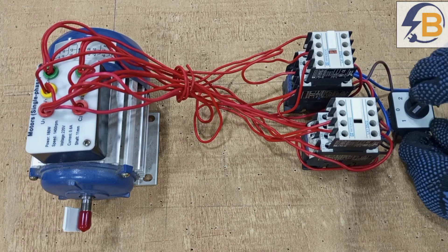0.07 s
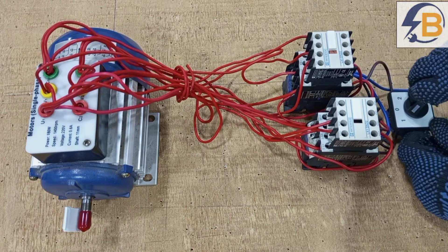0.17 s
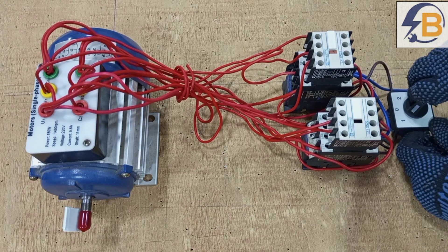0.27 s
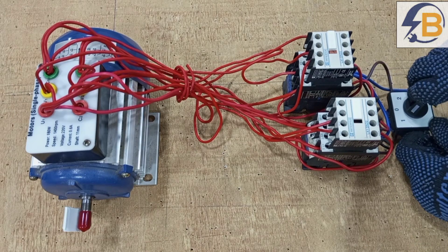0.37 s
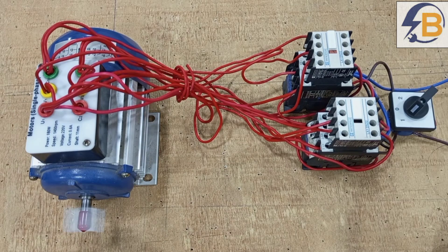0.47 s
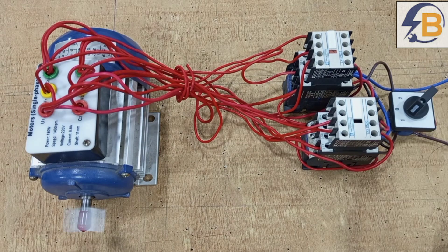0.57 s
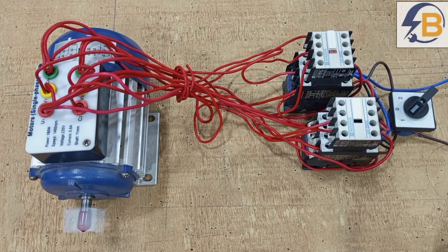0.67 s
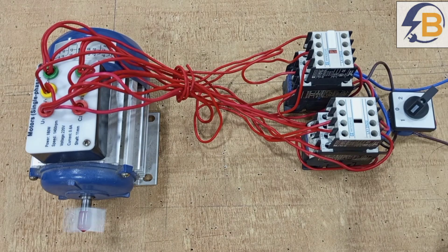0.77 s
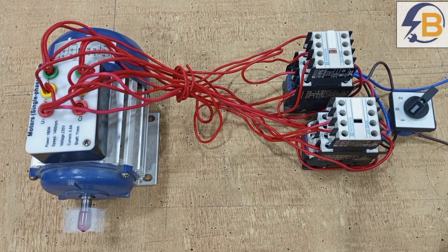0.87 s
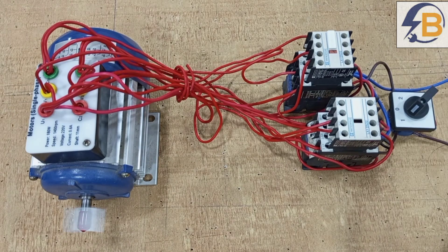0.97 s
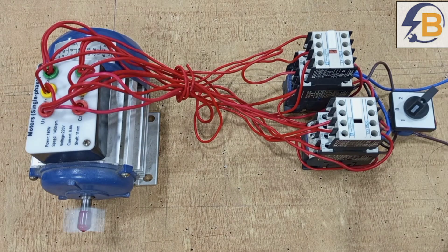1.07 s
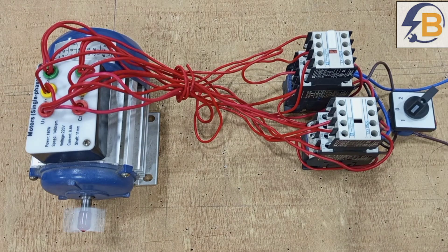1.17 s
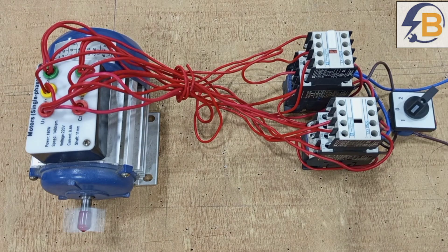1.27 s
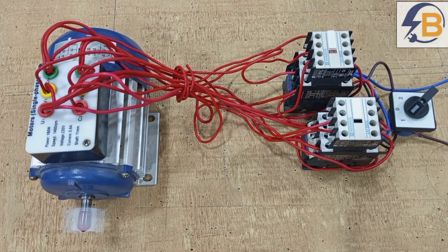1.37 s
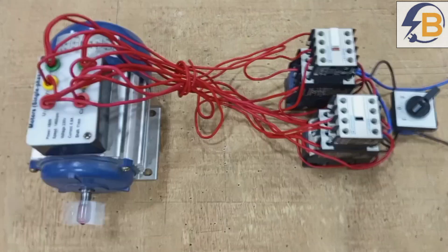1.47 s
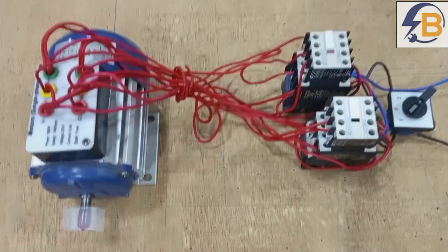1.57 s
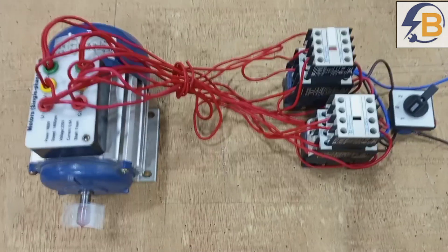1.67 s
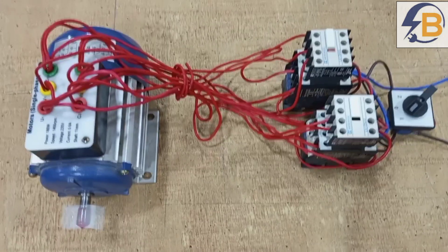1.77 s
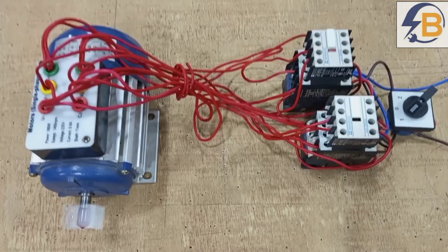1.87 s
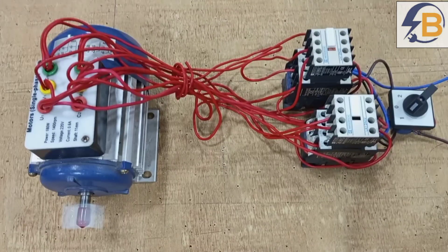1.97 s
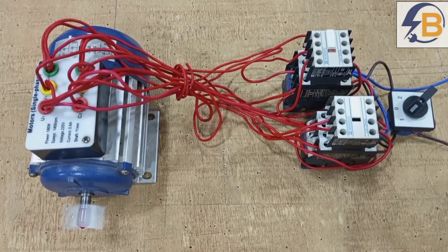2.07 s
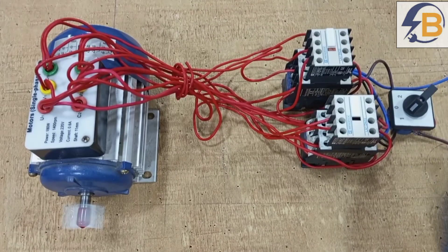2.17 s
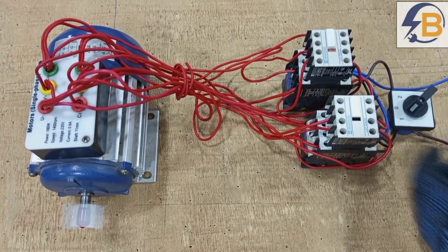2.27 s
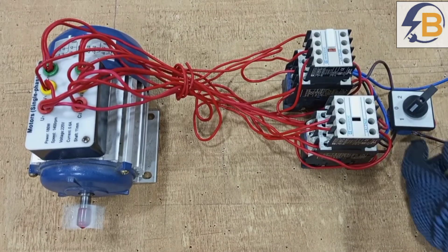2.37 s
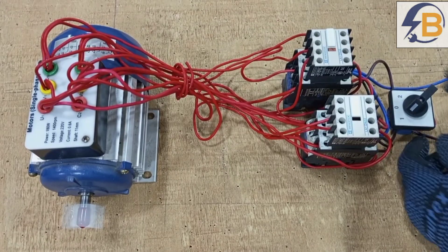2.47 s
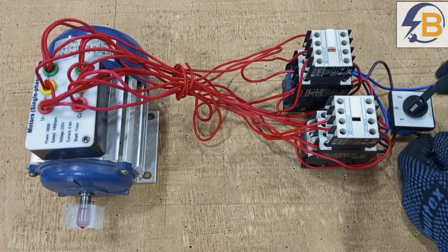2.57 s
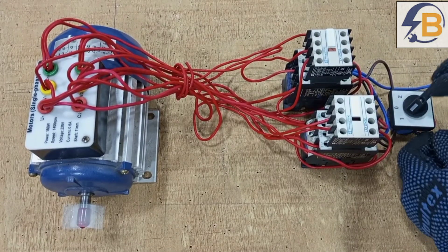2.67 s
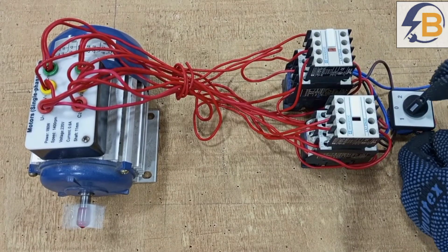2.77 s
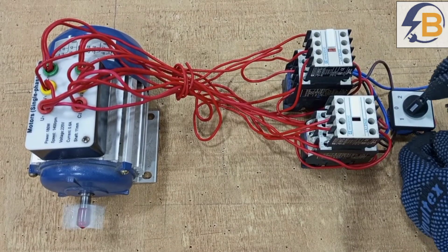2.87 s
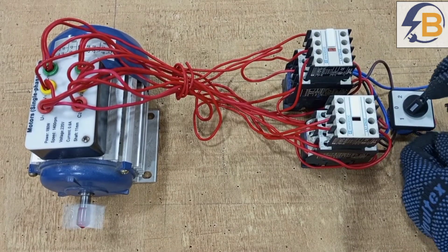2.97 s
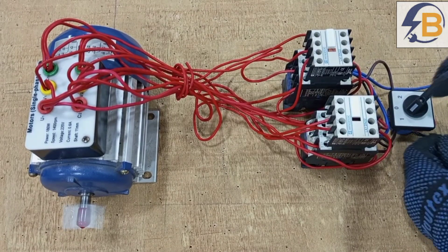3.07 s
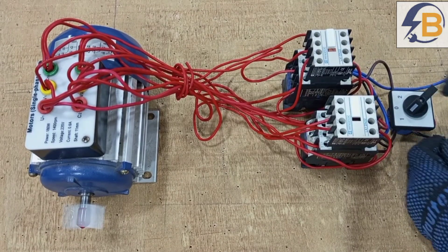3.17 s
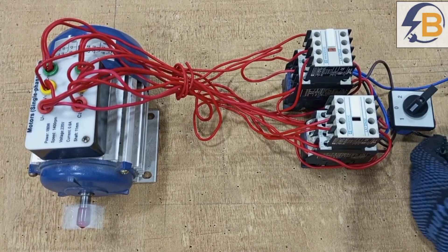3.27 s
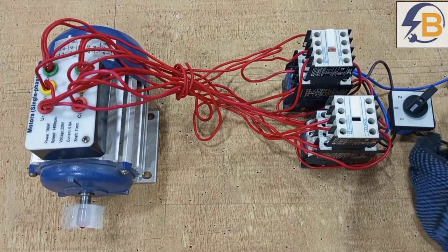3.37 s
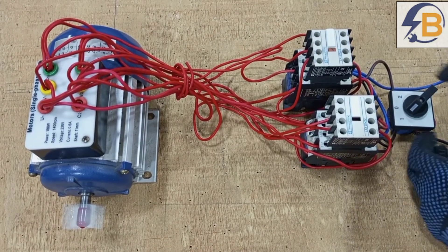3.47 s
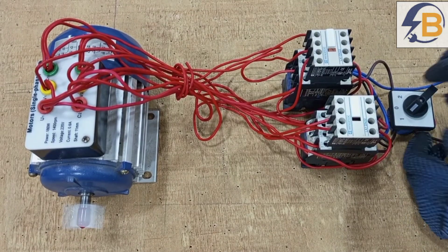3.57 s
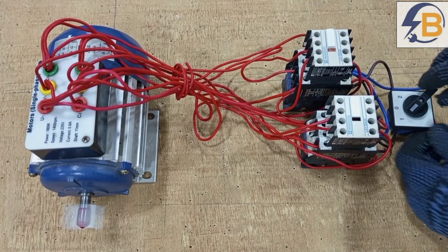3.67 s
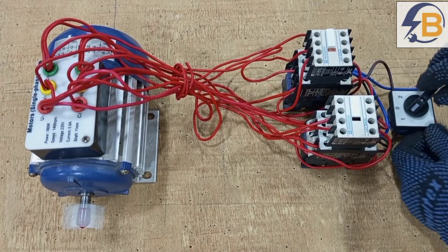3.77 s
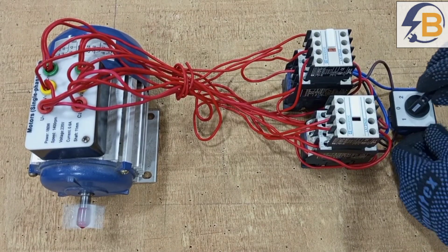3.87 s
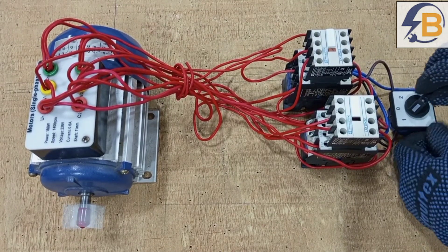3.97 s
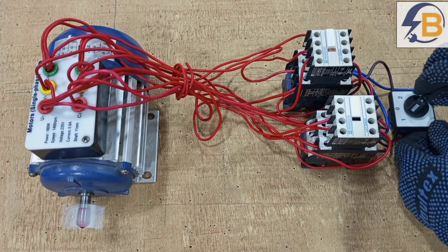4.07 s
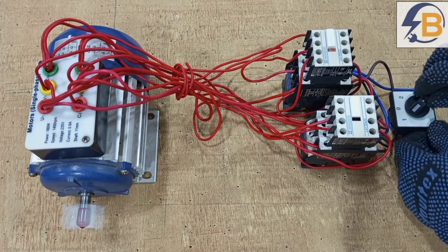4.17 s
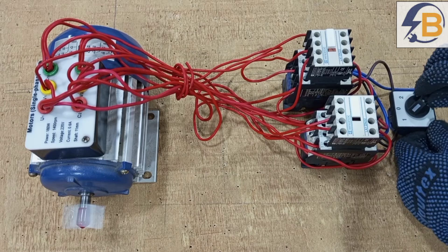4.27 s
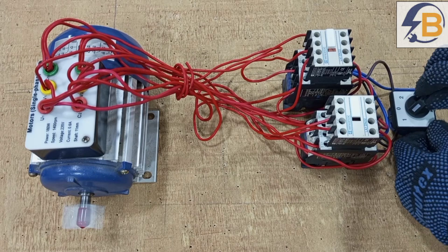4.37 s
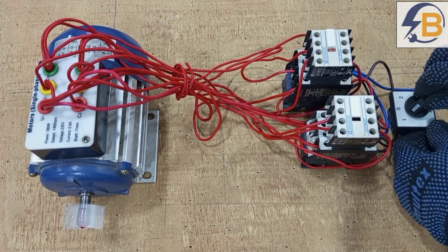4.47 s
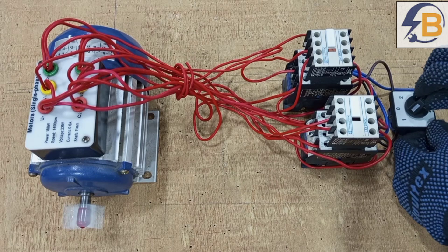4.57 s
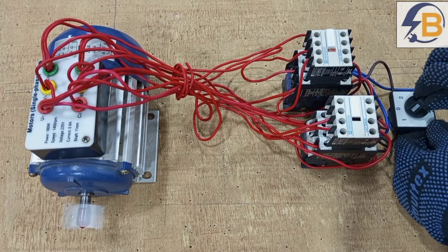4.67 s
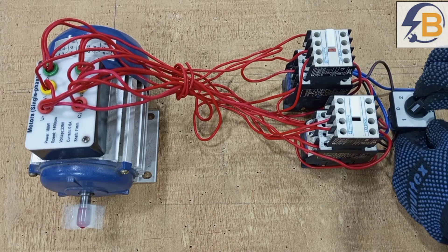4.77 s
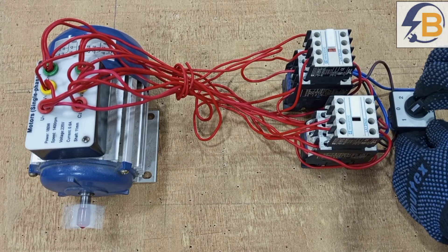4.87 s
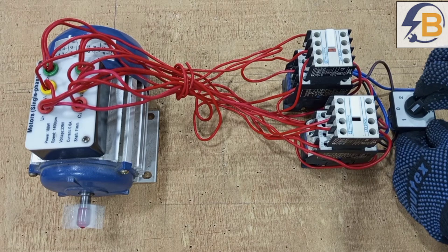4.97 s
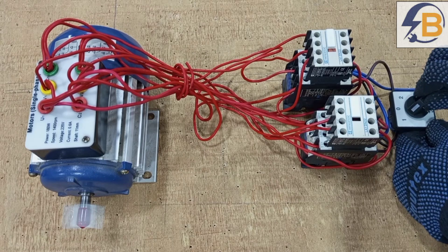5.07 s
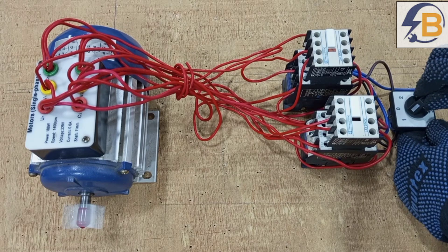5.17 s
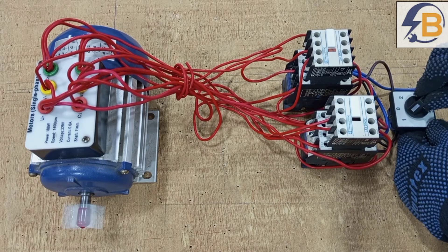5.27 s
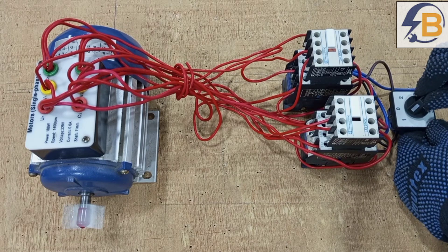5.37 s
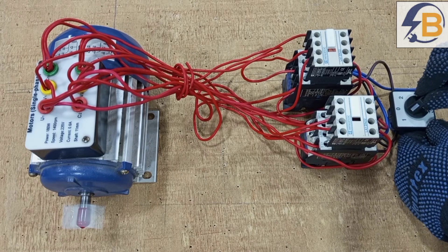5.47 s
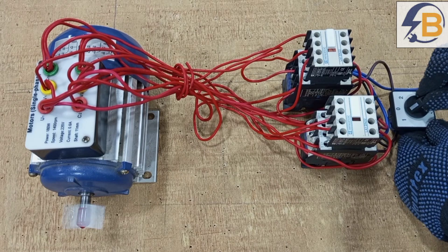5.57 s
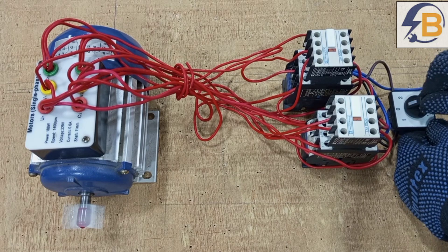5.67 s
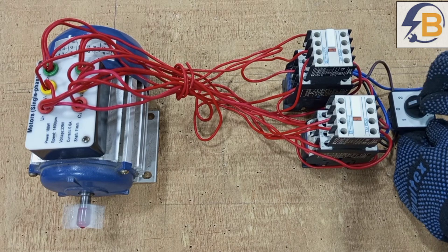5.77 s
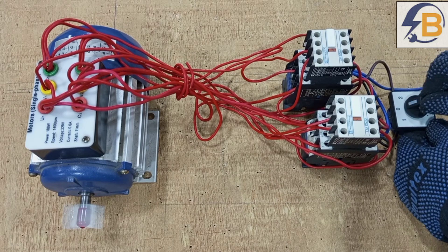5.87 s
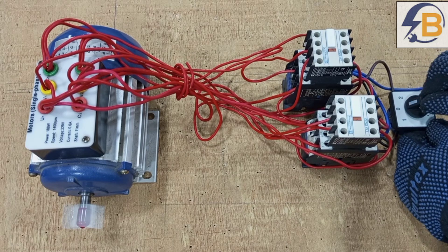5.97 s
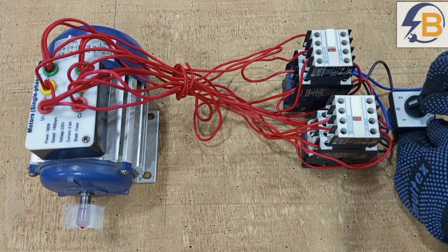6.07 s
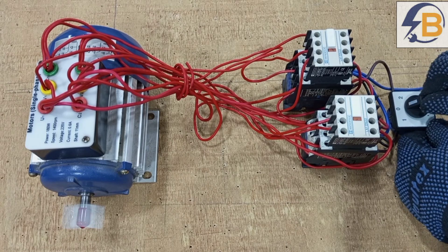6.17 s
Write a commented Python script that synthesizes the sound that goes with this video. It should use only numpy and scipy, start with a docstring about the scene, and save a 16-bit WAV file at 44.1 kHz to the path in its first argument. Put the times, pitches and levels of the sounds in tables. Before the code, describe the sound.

A hard plastic contactor clack, then a small electric motor surges into a low hum, runs quietly, and a second sharp clack cuts it off.

```python
"""A small mains motor on a wooden bench hums up, runs and is cut off: sines at twice mains and its octave.
A gloved hand turns a rotary switch and a contactor slams in; a second clack ends the run: bursts of noise
rung by a plastic housing. Each clack leaves a wash of noise dying band by band, the first cut off short.
Resonant noise whirrs in the motor's casing, rattles the bench and sings; gliding tones groan at run-up.
Stray ticks, faint narrow tones and brushes of soft noise come and go over a steady room floor."""
import sys
import numpy as np
from scipy import signal
from scipy.fft import rfft, irfft
from scipy.io import wavfile

SR = 44100
rng = np.random.default_rng(int(sys.argv[2]) if len(sys.argv) > 2 else 0)


def store_wav(level_fs):
    """Save 16-bit WAV to argv[1]."""
    pcm = np.round(np.clip(np.atleast_2d(level_fs), -1, 1) * 32767)
    wavfile.write(sys.argv[1], SR, pcm.T.astype(np.int16))


N = 274257

# magnetic hum surging at the start and settling:
# (time_s, level_db of the pull at twice mains, octave_level_db)
HUM_COURSE = [(0.41, -73, -88), (0.47, -56, -58), (0.54, -51.5, -51.5), (0.61, -50.5, -50.5),
              (0.88, -58, -52.5), (1.04, -60, -63), (1.3, -65.5, -65), (2.02, -70.5, -65.5),
              (2.16, -63.5, -67.5), (2.37, -69, -65.5), (3.24, -67, -67), (3.82, -70.5, -66),
              (4.15, -67, -67.5), (4.31, -71, -68.5), (5.63, -70, -71.5), (5.66, -70, -76)]
MOTOR_ON_S, POWER_OFF_S = HUM_COURSE[0][0], 5.665
PULL_HZ, SHAFT_HZ = 99.9, 24.9


def from_db(db):
    """Decibels to gain."""
    return 10 ** (np.asarray(db) / 20)


def rms_one(x):
    """Scale to rms 1."""
    return x / np.sqrt(np.mean(x ** 2) + 1e-20)


def seconds():
    """The time of every sample, in seconds."""
    return np.arange(N) / SR


def in_time(rows):
    """Columns of a curve table at every sample; silence before it, held after it."""
    time_s, *columns = np.transpose(rows)
    return [np.interp(seconds(), time_s, column, left=-200) for column in columns]


def at_hz(points, hz):
    """Read a (Hz, value) table on a log-frequency axis."""
    table_hz, values = np.array(points).T
    return np.interp(np.log(hz), np.log(table_hz), values)


def drift(rate):
    """Slow chance of spread 1, changing about rate times a second; drawn at every 40th sample."""
    r = np.exp(-80 * np.pi * rate / SR)
    chance = rng.standard_normal(N // 40 + 2002)
    slow = signal.lfilter([1], [1, -2 * r, r * r], chance)[2000:]   # skip the filter's start
    return np.interp(np.arange(N) / 40, np.arange(len(slow)), rms_one(slow))


def resonate(x, hz, width_hz):
    """One resonance with gain 1 on top."""
    r = np.exp(-np.pi * width_hz / SR)
    zeros = np.array([1, 0, -1]) * (1 - r * r) / 2
    poles = [1, -2 * r * np.cos(2 * np.pi * hz / SR), r * r]
    return signal.lfilter(zeros, poles, x)


def twice(x, hz, width_hz):
    """A steep resonance, rms 1."""
    return rms_one(resonate(resonate(x, hz, width_hz), hz, width_hz))


def alternating_modes(x, modes):
    """Parallel resonances of one body, every other one in opposite sign."""
    return sum((-1) ** k * from_db(db) * resonate(x, hz, width_hz)
               for k, (hz, width_hz, db) in enumerate(modes))


def band_pass(x, edges_hz):
    """Keep the band between two edges."""
    return signal.sosfilt(signal.butter(2, edges_hz, "band", fs=SR, output="sos"), x)


def steady(spectrum):
    """Stationary noise with the given spectrum; rms 1."""
    hz = np.maximum(np.arange(N // 2 + 1) * SR / N, 1)
    return rms_one(irfft(rfft(rng.standard_normal(N)) * from_db(at_hz(spectrum, hz)), N))


def coloured(spectrum, size, fading):
    """Fifth-octave bands of noise, each at its own level and dying at its own rate; rms 1 at the start."""
    out, power, t = 0, 0, np.arange(size) / SR
    edges = 60 * 2 ** np.arange(0, 8.3, 1 / 5)
    white = rng.standard_normal((2, size))   # neighbouring bands take different noise
    for k, (low, high) in enumerate(zip(edges, edges[1:])):
        band = band_pass(white[k % 2], [low, high])
        hz = np.sqrt(low * high)
        level_db = at_hz(spectrum, hz)
        out = out + band * from_db(level_db - at_hz(fading, hz) * t)
        power += np.mean(band ** 2) * from_db(2 * level_db)
    return out / np.sqrt(power)


def swells(rows):
    """Gain that opens for each (start_s, length_s, level_db) row, with soft edges."""
    t, edge_s = seconds(), 0.038
    gain = 0
    for start_s, length_s, db in rows:
        nearest_end_s = np.minimum(t - start_s, start_s + length_s - t)
        gain = gain + from_db(db) * np.clip(nearest_end_s / edge_s + .5, 0, 1)
    return gain


def surge():
    """How far the hum's octave stands above the settled motor's -66 dB, in dB; never below 0."""
    octave_db = in_time(HUM_COURSE)[1]
    return np.maximum(octave_db + 66, 0)


def powered():
    """Gate that is open from the motor's start until the power goes."""
    t = seconds()
    return (t > MOTOR_ON_S) & (t < POWER_OFF_S)


def room_floor():
    """Steady noise of the quiet room, strongest in the lows."""
    # spectrum of the room: (frequency_hz, relative density_db)
    room_colour = [(30, -19.5), (100, -5.5), (400, -3), (1000, -7), (2000, -10.5), (3500, -18),
                   (7300, -18.5), (8500, -35.5), (15500, -42.5)]
    return from_db(-73) * steady(room_colour)


def contacts():
    """Each row is a short noise burst in one band, rung by the housing; close rows make one clack or tick."""
    # bands of the clacks, stray ticks and snaps in the rustling:
    # (start_s, peak_level_db, centre_hz, width_octaves, rise_ms, t60_ms of the snap)
    bursts = [(0.0895, -20, 4450, 1.85, 1.07, 10.4), (.09, -29.5, 620, 1.0, 1.6, 39),
              (.09, -33, 1550, 0.5, 1.6, 30), (0.0976, -31, 9000, 7.3, .6, 12),
              (0.1035, -27.5, 805, 0.73, 0.69, 7), (0.1085, -30, 8000, 3.3, 2, 20.5),
              (0.1136, -26, 2500, 14, 0.52, 12), (.1198, -11, 3600, 2.8, 0.81, 3.2),
              (.1236, -18.5, 860, 1.54, .3, 3.6), (.125, -31.5, 376, 1.3, 1.6, 45),
              (0.1364, -32, 5490, 2.36, 1.1, 29.8), (.1455, -37, 6010, 1.498, 1.1, 27),
              (0.177, -32, 220, 1.8, 6.8, 43), (1.5679, -44.5, 9100, 0.27, .6, 9.1),
              (1.5688, -51.5, 4700, 0.58, .7, 13.5), (1.583, -42.5, 4900, 0.9, .6, 8),
              (1.5834, -47, 9200, 0.47, 0.44, 7.7), (1.583, -47.5, 1330, 0.37, 0.53, 20),
              (1.5867, -42, 1200, 0.8, 0.46, 14.5), (1.5863, -37, 5070, 0.9, 0.44, 6.7),
              (1.887, -49.5, 9600, 0.34, 1.5, 30), (2.029, -48, 9700, 0.56, 0.293, 180),
              (5.6801, -35, 7000, 1.9, 0.8, 16), (5.689, -33.5, 4000, 2.1, 5.3, 40),
              (5.6961, -18, 10100, 1.45, 3.83, 14), (5.694, -43, 340, 0.88, 2.5, 50),
              (5.7025, -28, 5000, 2.7, 0.65, 18), (5.7054, -8, 2700, 1.42, 1.8, 5.3),
              (5.707, -21, 14000, 1.5, 0.94, 22), (5.7201, -23.5, 3480, 9.3, 0.37, 29),
              (5.7315, -28, 3500, 1.7, 1.35, 30)]
    # resonances of the plastic housing: (frequency_hz, width_hz, gain_db)
    housing = [(864, 100, -16.5), (1700, 280, -0.5), (2428, 360, 3), (3140, 490, 6), (4010, 1200, -1),
               (5140, 361, 10.5), (5600, 920, 1), (6440, 140, 10.5), (7000, 335, -5.5), (9400, 3400, 4.5),
               (10590, 440, -3), (13880, 1200, -9.5)]
    out, t = np.zeros(N), np.arange(4000) / SR
    for start_s, peak_db, hz, octaves, rise_ms, t60_ms in bursts:
        burst = rng.standard_normal(len(t)) * np.minimum(1000 * t / rise_ms, 1) ** 2
        since_ms = np.maximum(1000 * t - rise_ms, 0)
        snap = from_db(-60 * since_ms / t60_ms)
        loose_parts = from_db(-20.0 - 60 * since_ms / 55)   # they settle after the snap
        burst *= snap + loose_parts
        burst[round(rise_ms * SR / 1000)] += 3.5   # the hardest touch comes at the top of the rise
        edges_hz = np.clip(hz * 2 ** (np.array([-.5, .5]) * octaves), 50, .45 * SR)
        burst = band_pass(burst, edges_hz)
        hit = alternating_modes(burst, housing) + 0.46 * burst
        at = round(start_s * SR)
        out[at:at + len(t)] += from_db(peak_db) * hit / np.abs(hit).max()
    return out


def wash(curve, colour, fading, ring, end_s):
    """Dense reflections after a clack: noise of the clack's colour, thinning band by band."""
    out = np.zeros(N)
    first, last = round(curve[0][0] * SR), min(round(end_s * SR), N)
    level_db = np.interp(np.arange(first, last) / SR, *np.transpose(curve))
    ramp = np.minimum(np.arange(last - first) / (0.0086 * SR), 1)   # 8.6 ms onset
    noise = coloured(colour, last - first, fading)
    # each tone's level is set free of the colour's level at its pitch
    ringing = sum(from_db(db - at_hz(colour, hz) - 2.0) * resonate(noise, hz, width_hz)
                  for hz, width_hz, db in ring)
    out[first:last] = ramp * from_db(level_db) * (1.15 * noise + ringing)
    return out


def switch_on_wash():
    """Reverberant wash of the first clack, cut off short."""
    # course before the ringing is added: (time_s, relative level_db)
    curve = [(0.134, -41), (0.182, -36.5), (0.402, -49), (0.41, -49.5)]
    # spectrum at the start: (frequency_hz, relative density_db)
    colour = [(100, -29.5), (170, 1), (400, 0.5), (900, -6), (1200, -11.5), (2000, -10), (2900, -12),
              (3600, -20), (5600, -9.5), (7500, -18.5), (9500, -15.5), (12500, -27.5), (15000, -26.5),
              (16500, -27)]
    # how much faster than the whole each band dies: (frequency_hz, extra_decay_db_per_s)
    fading = [(150, 56.5), (400, 44), (1000, -5.5), (3000, -8), (7000, 1.5), (14000, 28)]
    # tones that linger in the wash: (frequency_hz, width_hz, relative level_db)
    ring = [(412.2, 150, -0.5), (790, 120, -2.5), (2017, 28, -5.5), (3130, 120, -6), (4012, 270, -7.5),
            (5100, 44, -4.5), (5640, 420, -4.5), (7300, 54, -11), (8000, 80, -12.5), (9160, 44, -9.5),
            (9470, 24, -9), (9700, 170, -9)]
    return wash(curve, colour, fading, ring, end_s=.4125)


def magnetic_hum():
    """Magnetic pull at twice mains and its octave; the field collapses at power-off, a trace lingers."""
    t = seconds()
    pull_db, octave_db = in_time(HUM_COURSE)
    phase = 2 * np.pi * PULL_HZ * t
    hum = from_db(pull_db + 1.72 * drift(41.8)) * np.sin(phase + 0.094 * drift(8.7))
    hum += from_db(octave_db + 1.1 * drift(16)) * np.sin(2 * phase - 1.9)
    drop_db, dies_db_per_s = -4.5, 40
    dying_db = (t > POWER_OFF_S) * (drop_db - dies_db_per_s * (t - POWER_OFF_S))
    return np.sqrt(2) * from_db(dying_db) * hum


def bench_rattle():
    """Noise pulsing once per shaft turn shakes the wooden bench's resonances; jolts open it further."""
    # resonances of the bench: (frequency_hz, width_hz, gain_db)
    bench = [(252, 30, 6.5), (260, 19, 3.5), (303, 36.7, 14), (405.5, 21, 9.5)]
    # jolts that shake the bench: (start_s, length_s, level_db)
    jolts = [(3.74, 0.03, -66.5), (5.685, 0.092, -56.5), (5.8, 0.1, -62)]
    t = seconds()
    shake = rng.standard_normal(N) * (1 + 0.8 * np.cos(2 * np.pi * SHAFT_HZ * t))
    settled_db, db_per_surge_db, flicker_db = -82, .7, 3
    level_db = settled_db + db_per_surge_db * surge() + flicker_db * drift(6)
    gain = (t > MOTOR_ON_S) * from_db(level_db) + swells(jolts)
    return gain * rms_one(alternating_modes(shake, bench))


def casing_noise():
    """Bearing and fan noise: flickering resonances of the motor's casing over a broad bed."""
    # resonances of the casing: (frequency_hz, width_hz, relative level_db)
    casing = [(733, 34, 0), (772, 59, 2.5), (869.6, 29, -0.5), (1358, 22, -4.5), (2410, 43, -6),
              (2736, 30, -6.5), (2960, 24, -6), (3217, 120, -13), (3724, 61, -12), (4450, 49, -18),
              (5380, 40, -15), (5800, 38, -13.5)]
    # spectrum of the bed: (frequency_hz, relative density_db)
    bed_colour = [(30, -20), (90, 5), (200, -0.5), (350, -4), (550, -10.5), (800, -1), (1100, -23.5),
                  (1750, -18), (2200, -7.5), (3500, -19.5), (7400, -23), (8000, -29), (13000, -32),
                  (15300, -24.5)]
    white = rng.standard_normal(N)
    modes = 0
    for hz, width_hz, db in casing:
        mode = resonate(resonate(white, hz, 2 * width_hz), hz, width_hz)
        modes = modes + from_db(db + 3 * drift(6)) * mode
    return rms_one(modes) + from_db(-2.5) * steady(bed_colour)


def motor_lines():
    """Sines at pull overtones and shaft sidebands, each drifting in level while powered."""
    # lines of the motor: (frequency_hz, level_db relative to the casing's resonances)
    lines = [(224.7, -12), (249.7, -16), (274.7, -13), (299.7, -17), (324.6, -11), (399.6, -9),
             (499.5, -14)]
    t = seconds()
    tones = sum(from_db(db + 2 * drift(3.3)) * np.sin(2 * np.pi * hz * t + k)
                for k, (hz, db) in enumerate(lines))
    return np.sqrt(2) * powered() * tones


def magnetic_pull():
    """The pull's cycle as felt by loose parts, peaking a little ahead of the hum's crest."""
    phase_rad = .55
    return np.cos(2 * np.pi * PULL_HZ * seconds() - phase_rad)


def lamination_buzz():
    """Loose laminations buzz once per magnetic pull: gated treble noise that slowly grows."""
    level_db = -23 + 0.7 * seconds()   # relative to the casing's resonances
    gate = np.exp(1.2 * (magnetic_pull() - 1)) * from_db(1.5 * drift(10))
    buzz = rms_one(gate * twice(rng.standard_normal(N), hz=9250, width_hz=1700))
    return powered() * from_db(level_db) * buzz


def whistle():
    """A thin whistle of narrow noise comes and goes at a steady period."""
    period_s, peak_s = 1.075, 1.33
    swell = np.exp(4.5 * (np.cos(2 * np.pi * (seconds() - peak_s) / period_s) - 1))
    return swell * from_db(-27) * twice(rng.standard_normal(N), hz=13800, width_hz=40)


def whirr():
    """All flicker together; lines and buzz stop with the power, the rest sinks as the rotor coasts."""
    t = seconds()
    coast_start_s, coast_drop_db, coast_db_per_s = 5.8, -7, 12
    coast_db = (t > coast_start_s) * (coast_drop_db - coast_db_per_s * (t - coast_start_s))
    settled_db, db_per_surge_db, flicker_db = -73.5, 0.052, 1.6
    level_db = settled_db + db_per_surge_db * surge() + flicker_db * drift(6.9) + coast_db
    source = casing_noise() + motor_lines() + lamination_buzz() + whistle()
    return (t > MOTOR_ON_S) * from_db(level_db) * source


def rough_singing():
    """Rough mid-pitched noise bands that swell with the motor's surge."""
    # bands of the rough voice: (frequency_hz, width_hz, relative level_db)
    bands = [(1908, 14, 1.5), (2095, 153, 7.5), (2250, 23, 2)]
    white = rng.standard_normal(N)
    rough = rms_one(sum(from_db(db) * twice(white, hz, width_hz) for hz, width_hz, db in bands))
    settled_db, db_per_surge_db, flicker_db = -77.5, 0.59, 2
    level_db = settled_db + db_per_surge_db * surge() + flicker_db * drift(5.5)
    return powered() * from_db(level_db) * rough


def thin_whine():
    """Narrow noise at a fixed pitch, faint while powered, with brief flares."""
    # flares of the whine: (start_s, length_s, level_db)
    flares = [(0.809, 0.034, -80), (0.873, 0.104, -75.5), (1.144, 0.13, -74.5), (1.318, 0.059, -70),
              (2.374, 0.033, -78), (2.791, 0.081, -72), (3.163, 0.063, -77), (3.798, 0.053, -73),
              (4.505, 0.144, -76), (4.713, 0.056, -78.5), (4.856, 0.094, -69), (5.019, 0.034, -75),
              (5.51, 0.072, -79.5)]
    gain = from_db(-86 + 2 * drift(8.3)) + swells(flares)
    return powered() * gain * twice(rng.standard_normal(N), hz=2868, width_hz=35)


def groans():
    """The bench groans as the rotor runs up: slightly wavering tones that glide, swell and sink; near 400 Hz
    the pull's fourth harmonic surges with them."""
    # groans of the bench, and the surging fourth pull harmonic near 400 Hz: (start_s, end_s, from_hz, to_hz,
    # level_db)
    glides = [(0.418, 0.48, 310, 333, -60.5), (0.47, 0.64, 401.5, 398, -65), (0.529, 0.62, 321, 295, -66),
              (0.611, 0.778, 262, 341.4, -58.5), (0.67, 0.76, 356, 370, -66.5),
              (0.79, 0.88, 292, 300, -59.5), (0.79, 0.96, 335, 311, -62.5), (0.951, 1.01, 301, 250, -69)]
    out = np.zeros(N)
    for start_s, end_s, from_hz, to_hz, db in glides:
        first, last = round(start_s * SR), round(end_s * SR)
        share = np.linspace(0, 1, last - first)
        pitch_hz = from_hz + (to_hz - from_hz) * share + 6 * drift(25)[:len(share)]
        phase = 2 * np.pi * np.cumsum(pitch_hz) / SR + rng.uniform(0, 2 * np.pi)
        gain = from_db(db + 2.5 * drift(30)[:len(share)]) * np.sin(np.pi * share) ** 0.7
        out[first:last] += np.sqrt(2) * gain * np.sin(phase)
    return out


def faint_tones():
    """Short rough tones: narrow noise that rises fast and sinks away."""
    # tones: (start_s, end_s, frequency_hz, width_hz, level_db)
    tones = [(0.79, 0.83, 6000, 50, -79), (0.922, 0.96, 6000, 50, -79.5), (1.075, 1.135, 6000, 50, -82),
             (1.094, 1.19, 5500, 50, -81), (1.09, 1.18, 4550, 50, -82.5), (1.68, 1.878, 727, 70.1, -61.5),
             (1.828, 1.903, 5480, 60, -79), (1.851, 2.004, 10300, 70, -74), (1.87, 1.997, 9080, 60.5, -70),
             (1.894, 2.032, 9900, 60, -76), (1.875, 1.958, 10770, 70, -78), (2.02, 2.125, 3760, 80, -77),
             (2.063, 2.197, 5370, 120, -78), (5.422, 5.563, 12740, 250, -76),
             (5.441, 5.538, 13420, 199, -75.5), (5.442, 5.47, 11830, 80.3, -86.5)]
    out = np.zeros(N)
    for start_s, end_s, hz, width_hz, db in tones:
        first, last = round(start_s * SR), round(end_s * SR)
        tone = twice(rng.standard_normal(12000), hz, width_hz)[-(last - first):]   # well rung up
        shape = np.sin(np.pi * np.linspace(0, 1, len(tone)) ** 0.57)
        out[first:first + len(tone)] += from_db(db) * tone * shape
    return out


def rustle():
    """Cloth or a hand brushes by: soft treble noise that swells up and dies away."""
    # brushes: (start_s, rise_s, level_db, decay_db_per_s)
    brushes = [(1.13, 0.094, -78, 45), (1.85, 0.05, -72, 44), (2.028, 0.043, -63.5, 87.5)]
    # spectrum of the brushing: (frequency_hz, relative density_db)
    colour = [(2500, -28), (3600, -10.5), (5600, 2.5), (7000, -5), (9500, -1.5), (11000, -8), (13500, -19),
              (15500, -9.5)]
    t, gain = seconds(), 0
    for start_s, rise_s, db, decay_db_per_s in brushes:
        rising = np.clip((t - start_s) / rise_s, 0, 1)
        since_top_s = np.maximum(t - start_s - rise_s, 0)
        gain = gain + rising * from_db(db - decay_db_per_s * since_top_s)
    return gain * steady(colour)


def bearing_sizzle():
    """A bearing sizzle sets in late: narrow noise pulsing with the magnetic pull."""
    # stretches of sizzle: (start_s, length_s, level_db)
    stretches = [(2.98, 0.27, -84), (3.34, 0.48, -81.5), (3.86, 0.15, -83.5), (4.08, 0.32, -84.5),
                 (4.4, 0.29, -88.5), (4.68, 0.56, -84)]
    pulsing = np.exp(1.0 * magnetic_pull())   # depth 1
    sizzle = rms_one(pulsing * twice(rng.standard_normal(N), hz=5240, width_hz=190))
    return powered() * swells(stretches) * from_db(2.5 * drift(25)) * sizzle


def switch_off_wash():
    """Reverberant wash of the second clack, left to die away."""
    # course before the ringing is added: (time_s, relative level_db)
    curve = [(5.722, -40), (5.756, -35.5), (6.094, -52), (6.218, -64)]
    # spectrum at the start: (frequency_hz, relative density_db)
    colour = [(150, -50), (330, 0), (550, -4.5), (900, -6), (1250, -14), (1600, -3), (2400, -2.5),
              (3200, -2.5), (4350, -13.5), (5500, -10), (7500, -12), (9800, -10.5), (12500, -22.5),
              (15500, -11)]
    # how much faster than the whole each band dies: (frequency_hz, extra_decay_db_per_s)
    fading = [(300, 220), (900, 194), (1600, 0.1), (3300, 4.5), (4400, 5.6), (6300, 6.2), (6800, 5),
              (7400, 56), (10000, 59), (14000, 87)]
    # tones that linger in the wash: (frequency_hz, width_hz, relative level_db)
    ring = [(1895, 350, 1.5), (2400, 46, -14.5), (2640, 89, -7), (2940, 47, -6), (3960, 20, -14),
            (4000, 130, -1.5), (5110, 270, -6.5), (5980, 160, -7), (6700, 80.5, -9), (7200, 88, -24),
            (7800, 28, -17.5), (9100, 92, -9)]
    return wash(curve, colour, fading, ring, end_s=N / SR)


def scene():
    """All sources over the room's floor, in one channel."""
    clacks = contacts() + switch_on_wash() + switch_off_wash()
    motor = magnetic_hum() + bench_rattle() + whirr()
    singing = rough_singing() + thin_whine() + bearing_sizzle()
    nearby = groans() + faint_tones() + rustle()
    return (room_floor() + clacks + motor + singing + nearby)[None]


def record(dry):
    """The top is cut steeply above 15750 Hz."""
    return signal.sosfilt(signal.ellip(8, .5, 55, 15750, fs=SR, output="sos"), dry)


dry = scene()
out = record(dry)
store_wav(out)
```